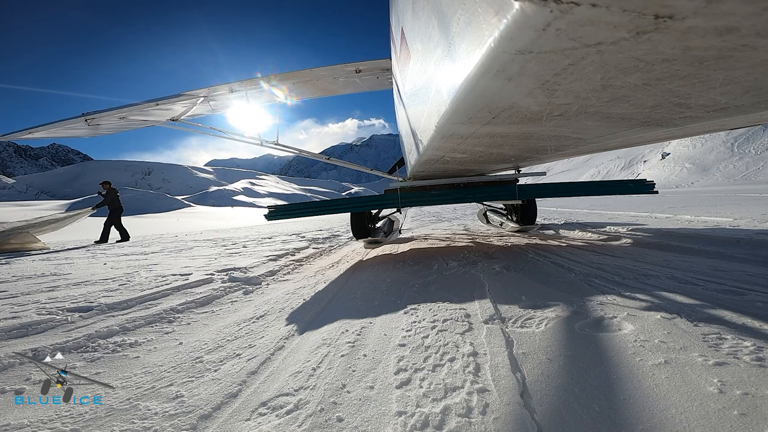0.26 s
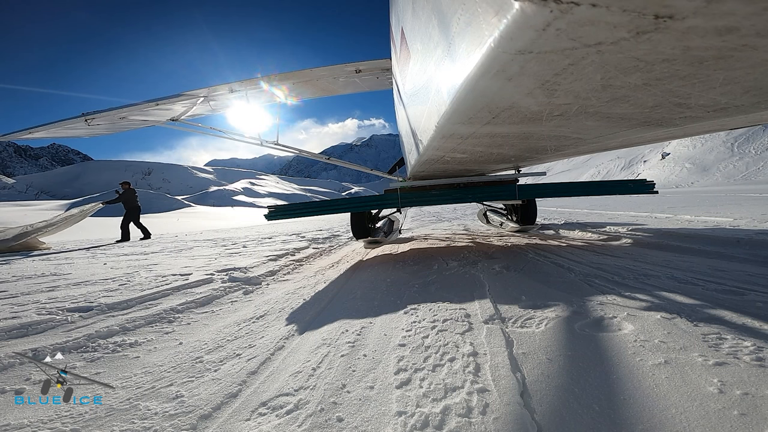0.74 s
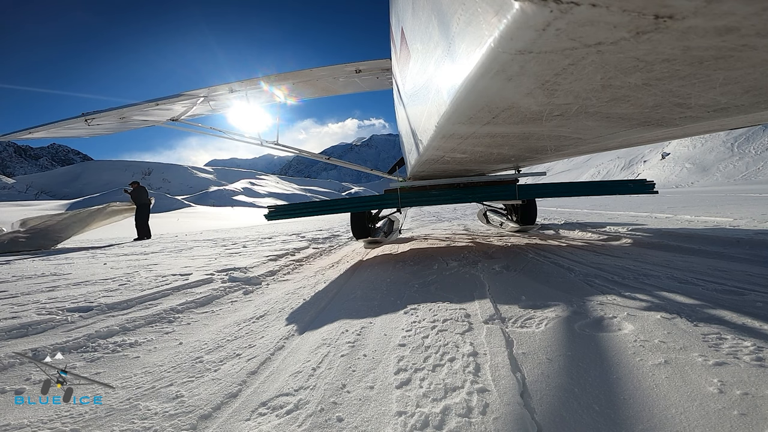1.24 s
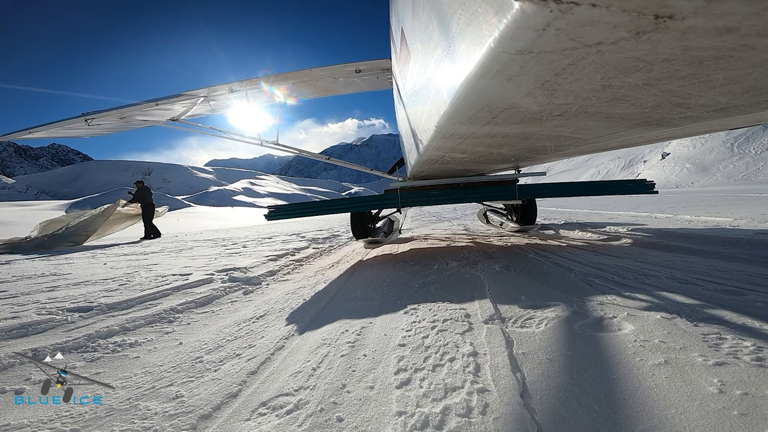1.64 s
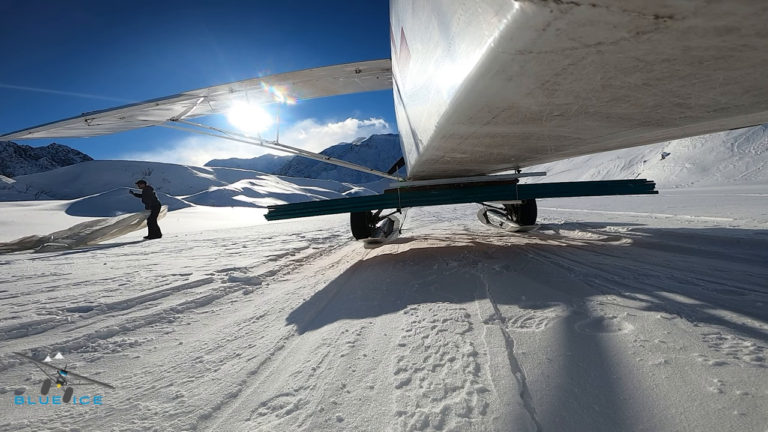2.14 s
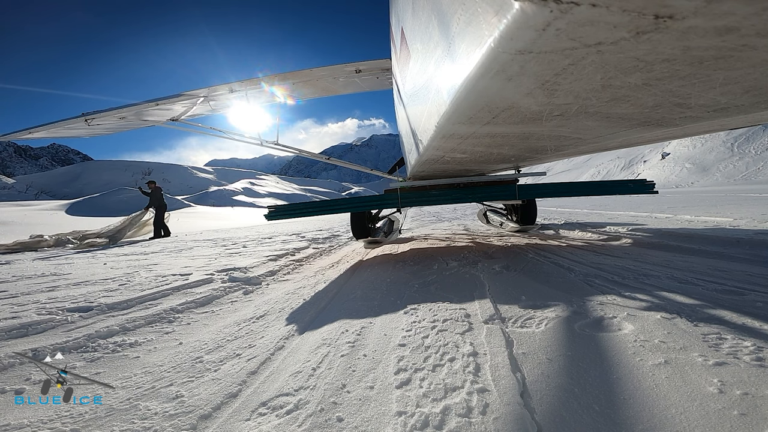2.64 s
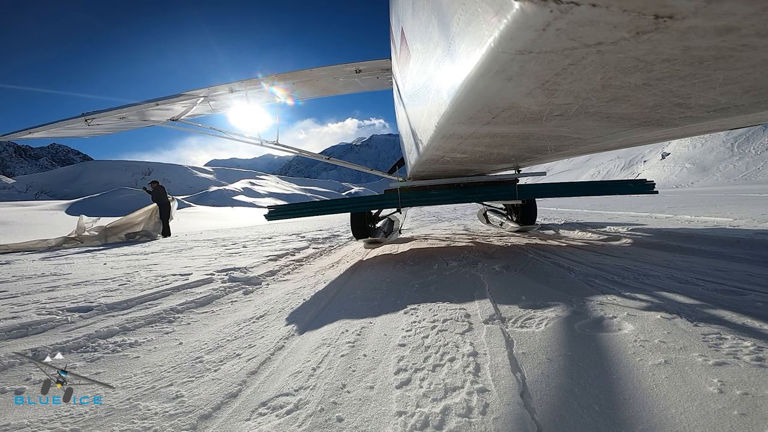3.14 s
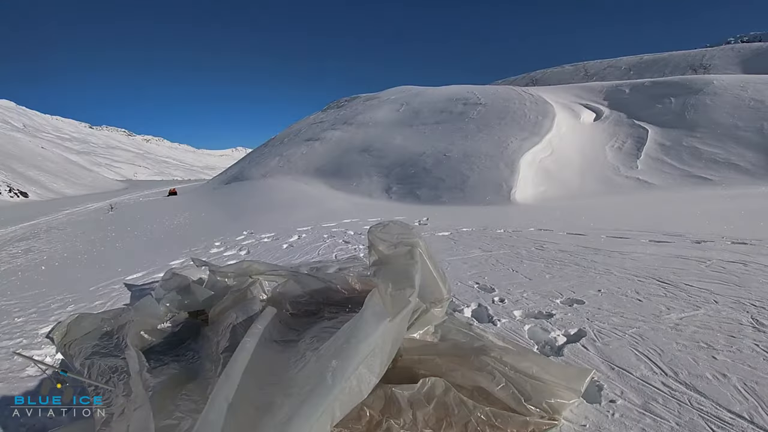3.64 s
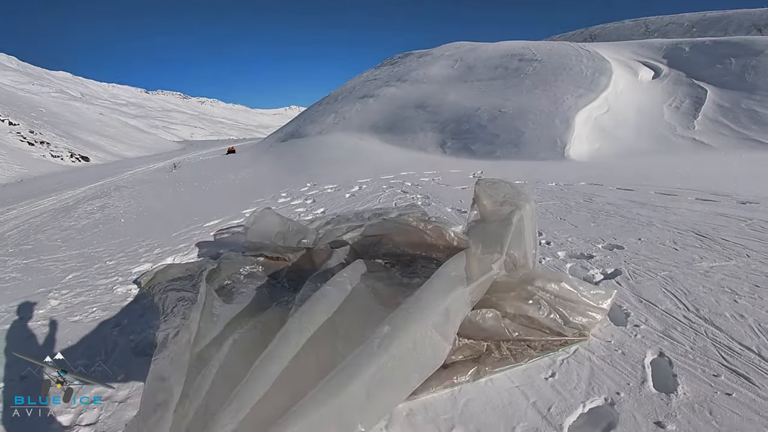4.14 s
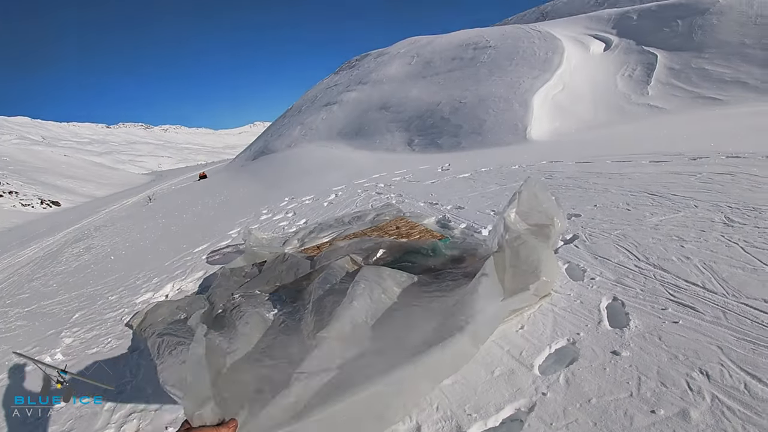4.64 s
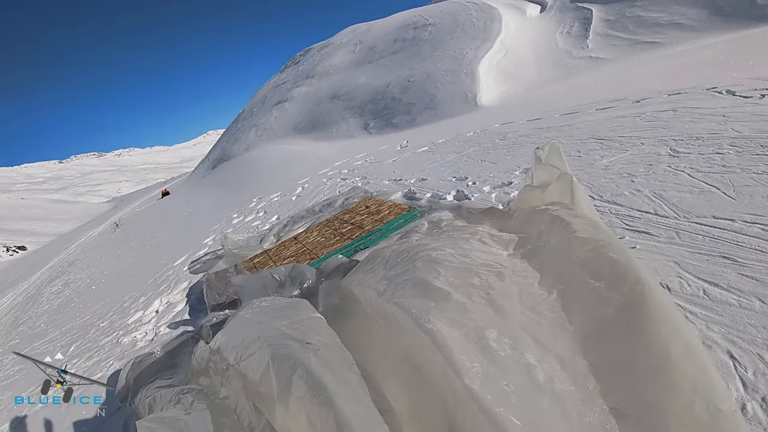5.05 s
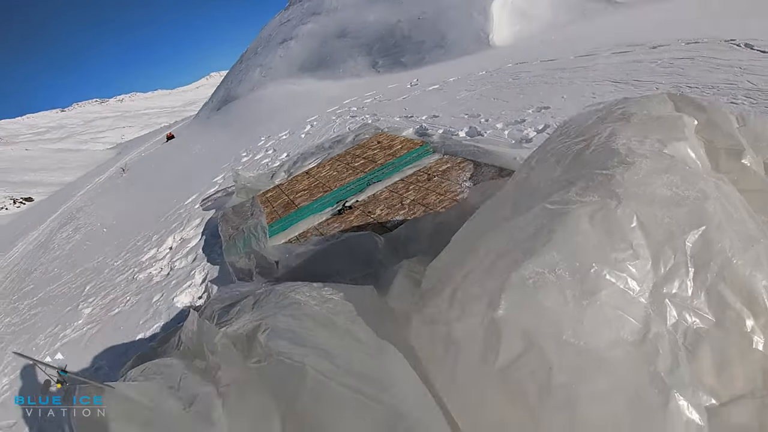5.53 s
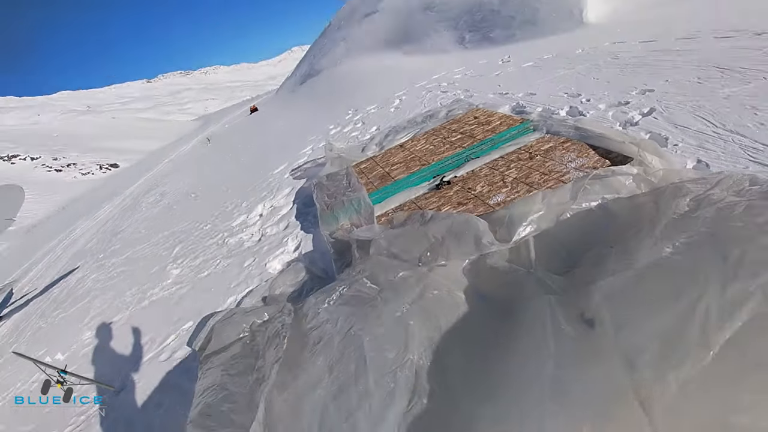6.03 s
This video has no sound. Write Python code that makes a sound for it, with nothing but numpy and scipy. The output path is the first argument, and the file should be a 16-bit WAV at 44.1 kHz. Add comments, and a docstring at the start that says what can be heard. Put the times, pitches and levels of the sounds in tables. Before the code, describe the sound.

Distant swishing drags of plastic over snow cut suddenly to loud close crinkling and flapping, ending with a few soft crunching knocks.

```python
"""Open snow, with a big sheet of clear plastic dragged in tugs some way off to the left of the microphone.
Then, abruptly, it is right at the microphone: it rubs, crackles, snaps and billows, pulled over a crate.
At the very end the sheet stops; a few soft crunching knocks remain in faint open air.
Rubbing, crackle and billow are coloured noise, much of it driven by random crease flips;
snaps are short noise bursts, flaps and knocks are sagging tones with noise, heaves are low rumble."""
import sys
import numpy as np
from scipy import signal
from scipy.fft import rfft, irfft, next_fast_len
from scipy.io import wavfile
from scipy.ndimage import uniform_filter1d, map_coordinates

SR = 44100
rng = np.random.default_rng(int(sys.argv[2]) if len(sys.argv) > 2 else 0)


def dump(signal):
    """Clip the signal to [-1, 1] and save it as 16-bit WAV at the path in sys.argv[1]."""
    limited = np.clip(np.atleast_2d(signal).T, -1, 1)
    pcm = np.round(limited * 32767).astype(np.int16)
    wavfile.write(sys.argv[1], SR, pcm)


N = 277150


def amp(db):
    """Decibels to gain."""
    return 10 ** (np.asarray(db) / 20)


def unit(x):
    """Scale to rms 1."""
    return x / np.sqrt(np.mean(x ** 2) + 1e-20)


def curves(rows):
    """One value per sample for each column after the time."""
    s, *cols = np.transpose(rows)
    return [np.interp(np.arange(N) / SR, s, c) for c in cols]


def wobble(rate):
    """A smooth random curve with rate knots a second."""
    knots = rng.standard_normal(int(N * rate / SR) + 4)
    return map_coordinates(knots, [np.arange(N) * rate / SR])


def along(points, hz):
    """(frequency [Hz], value) points joined on a log frequency axis."""
    f, v = np.transpose(points)
    return np.interp(np.log(hz + 1), np.log(f), v)


def filtered(x, response):
    """x times a complex response of frequency, padded so that the end does not wrap round."""
    m = next_fast_len(N + SR // 2)
    return irfft(rfft(x, m) * response(np.fft.rfftfreq(m, 1 / SR)), m)[..., :N]


def coloured(x, spectrum):
    """x through a (frequency [Hz], gain [dB]) spectrum."""
    return filtered(x, lambda hz: amp(along(spectrum, hz)))


def add(track, s, sound):
    """Mix a short sound into a track at time s."""
    part = track[max(round(s * SR), 0):][:len(sound)]
    part += sound[:len(part)]


def stroke(start, rise, hold, release_db_per_s):
    """Gain of one tug: it builds up, holds and dies away."""
    t = np.arange(N) / SR - start
    return np.clip(t / rise, 0, 1) * amp(-release_db_per_s * np.maximum(t - rise - hold, 0))


def dappled(x, depth_db, size):
    """Random gain patches in time and pitch: every facet of the sheet favours its own frequencies."""
    z = signal.stft(x, nperseg=size)[2]
    field = uniform_filter1d(rng.standard_normal(z.shape), size=3, axis=0)
    field = uniform_filter1d(field, size=3, axis=1)
    return signal.istft(z * amp(depth_db * unit(field)), nperseg=size)[1][:N]


def buckling(rate, spread_db, life, clump_db):
    """Power (mean near 1) of creases flipping at random, rate a second; strength swells in clumps.

    The amplitude of each flip falls to 1/e in life seconds."""
    flips = rng.random(N) < rate / SR
    strength_db = spread_db * np.clip(rng.standard_normal(N), -2.2, 2.2)
    sizes = amp(strength_db + clump_db * wobble(70))
    power = signal.lfilter([1], [1, -np.exp(-2 / (life * SR))], flips * sizes ** 2)
    # the pull sets the mean power, however it is shared among the creases
    local_mean = uniform_filter1d(uniform_filter1d(power, size=3000), size=3000)
    return power / (np.abs(local_mean) + 1e-9)


def rustle(power, spectrum, smooth, facet_db):
    """Flips radiate tiny noise bursts; the smooth share stands for the countless smallest ones; rms 1."""
    bursts = rng.standard_normal(N) * np.sqrt(smooth + (1 - smooth) * power)
    return unit(coloured(dappled(bursts, facet_db, size=192), spectrum))


def snap(hz, t60, octaves):
    """One crease popping through: a noise burst of peak 1 around its facet's pitch, down 60 dB in t60 s."""
    t = np.arange(SR // 20) / SR
    distance = np.log2((np.fft.rfftfreq(len(t), 1 / SR) + 1) / hz) / octaves
    ring = irfft(rfft(rng.standard_normal(len(t))) / (1 + distance ** 4), len(t))
    attack = 1 - np.exp(-t / 0.0002)
    burst = np.tanh(unit(ring)) * amp(-60 * t / t60) * attack
    return burst / np.abs(burst).max()


def thump(hz, t60, sag):
    """A slack panel swings a few times, its pitch sagging as the tension goes; peak 1."""
    t = np.arange(SR // 4) / SR
    fade = amp(-60 * t / t60)
    cycles = hz * np.cumsum(1 - sag * (1 - fade)) / SR
    swing = np.sin(2 * np.pi * cycles) * fade * (1 - np.exp(-2 * hz * t))
    return swing / np.abs(swing).max()


def strays(level_db, per_s, over_db, centre_hz, clump_db):
    """Lesser creases pop at random moments, louder in flurries, each with its own pitch and life."""
    out = np.zeros(N)
    flurry_db = level_db + over_db + clump_db * np.tanh(wobble(45))
    for s in rng.uniform(0, (N - 1) / SR, int(per_s * N / SR)):
        pitch, life = np.clip(rng.standard_normal(2), -1.6, 1.6)
        hz = centre_hz * 2 ** (0.48 * pitch)
        pop = snap(hz, t60=0.007 * np.exp(0.72 * life), octaves=0.32)
        add(out, s, amp(flurry_db[int(s * SR)]) * pop)
    return out


# tugs on the distant sheet, before slackening and catching: (time [s], rise [s], hold [s],
# release [dB/s], sliding level [dB], crackle level [dB], billow level [dB])
DISTANT_TUGS = [(0.133, 0.11, .02, 45, -49, -44, -44), (0.37, .04, .02, 60, -52, -47, -48),
                (0.83, .06, .1, 40, -45, -46, -45), (0.9, .19, .12, 25, -38, -39.5, -41.5),
                (1.78, 0.026, 0.22, 98, -33, -39, -45), (2.57, 0.22, 0.17, 34, -37.5, -42, -43)]
# the lifted sheet settles back onto the snow: (time [s], sliding level [dB], billow level [dB])
SETTLINGS = [(1.33, -35.5, -40.5), (3.002, -39, -46)]
SETTLE_RISE_S, SETTLE_HOLD_S, SETTLE_RELEASE_DB_PER_S = 0.042, 0.053, 83
# the sheet still creeps between tugs, ever more quietly
IDLE_SLIDE_DB, IDLE_CRACKLE_DB, IDLE_BILLOW_DB = -45, -48, -49
IDLE_FADE_DB_PER_S = 2.0
CREASE_RISE_SHARE = 0.93  # creases tighten and flip before the whole sheet is sliding
# the sheet slackens just before each tug: depth, lead, half length
SLACK_DB, SLACK_LEAD_S, SLACK_S = -2.5, 0.028, 0.025


def drag_gains():
    """Gains of sliding, crackle and billow: tugs and settling add in power to a slow creep."""
    t = np.arange(N) / SR
    idle_db = np.array([[IDLE_SLIDE_DB], [IDLE_CRACKLE_DB], [IDLE_BILLOW_DB]])
    slide, crackle, billow = amp(idle_db - IDLE_FADE_DB_PER_S * t)
    for start, rise, hold, release, slide_db, crackle_db, billow_db in DISTANT_TUGS:
        tug = stroke(start, rise, hold, release)
        tightening = stroke(start, CREASE_RISE_SHARE * rise, hold, release)
        slide = np.hypot(slide, tug * amp(slide_db))
        crackle = np.hypot(crackle, tightening * amp(crackle_db))
        billow = np.hypot(billow, tug * amp(billow_db))
    for start, slide_db, billow_db in SETTLINGS:
        settle = stroke(start, SETTLE_RISE_S, SETTLE_HOLD_S, SETTLE_RELEASE_DB_PER_S)
        slide = np.hypot(slide, settle * amp(slide_db))
        billow = np.hypot(billow, settle * amp(billow_db))
    slack = sum(np.exp(-((t - start + SLACK_LEAD_S) / SLACK_S) ** 2) for start, *_ in DISTANT_TUGS)
    return np.array([slide, crackle, billow]) * amp(SLACK_DB * slack)


def tick():
    """A distant crease: a short, bright crack over the dull ring of its panel."""
    ring = amp(-1) * snap(hz=1350, t60=0.018, octaves=0.6)
    crack = amp(-4) * snap(hz=3800, t60=0.012, octaves=0.8)
    return ring + crack


# share of the sliding power that is a hollow scrape on the snow crust: (time [s], share [0-1])
CRUST_SHARE = [(0, 0.5), (1.4, 0), (1.9, 0.92), (2.2, 0.75), (3.5, 0.99)]
# relative noise spectra of the distant sheet: (frequency [Hz], density [dB per Hz])
DISTANT_GLIDE = [(200, -16), (430, -4), (640, 2), (830, -0.5), (1100, 2), (1450, 1.5), (1800, -2.5),
                 (2300, -16), (3200, -13), (7000, -58)]
DISTANT_SCRAPE = [(250, -39), (420, -17), (660, -8), (810, -16.5), (1010, -2), (1350, -4.5), (1750, -12),
                  (2400, -15.5), (7000, -66)]
DISTANT_CRACKLE = [(1200, -18), (2100, -6), (2900, -3), (3600, 0), (4300, -4), (5000, -9.5), (6500, -12),
                   (8500, -17.5), (12500, -33), (15500, -57)]
DISTANT_BILLOW = [(20, -32), (45, -23), (70, -11.5), (120, -6.5), (180, 1.5), (270, -3.5), (400, -8.5),
                  (1000, -46), (3000, -90)]
# single creases that snap far off, before distance dulls them: (time [s], level [dB])
DISTANT_TICKS = [(0.0857, -26), (0.2533, -31), (1.5868, -29), (2.2817, -27.5), (2.4184, -36), (2.4897, -36),
                 (2.5965, -32), (3.1564, -29)]
# distance dulls a tick on its way to the microphone: (frequency [Hz], gain [dB])
DISTANCE_LOSS = [(1000, -1), (5000, 0), (9000, -1.5), (13000, -5), (15500, -25)]


def distant_sheet():
    """Each tug slides the sheet over the snow, flips creases and shakes its slack."""
    catch_db = 1.04 * wobble(11)  # the film catches and slips on the snow
    slide_gain, crackle_gain, billow_gain = drag_gains() * amp(catch_db)
    crust, = curves(CRUST_SHARE)
    creases = buckling(rate=700, spread_db=4.5, life=0.0039, clump_db=1.5)
    glide = np.sqrt(1 - crust) * rustle(creases, DISTANT_GLIDE, smooth=1.0, facet_db=2.0)
    scrape = np.sqrt(crust) * rustle(creases, DISTANT_SCRAPE, smooth=0.49, facet_db=1.5)
    slide = slide_gain * (glide + scrape)
    crinkles = buckling(rate=800, spread_db=2.0, life=0.004, clump_db=4.0)
    flips = 0.5 * (creases + crinkles)
    crackle = crackle_gain * rustle(flips, DISTANT_CRACKLE, smooth=0.52, facet_db=1.0)
    billow = billow_gain * rustle(creases, DISTANT_BILLOW, smooth=0.8, facet_db=2.8)
    crackle_db = 20 * np.log10(crackle_gain)
    ticks = strays(crackle_db, per_s=59, over_db=3.6, centre_hz=3200, clump_db=2)
    for s, db in DISTANT_TICKS:
        add(ticks, s, amp(db) * tick())
    return slide + crackle + billow + coloured(ticks, DISTANCE_LOSS)


def scattered(x):
    """The same bursts with their waves jumbled, as after many ever-changing bounces."""
    z = signal.stft(x, nperseg=128)[2]
    random_phase = np.exp(2j * np.pi * rng.random(z.shape))
    jumbled = signal.istft(z * random_phase, nperseg=128)[1][:N]
    return unit(jumbled) * np.std(x)


# left microphone port over right port: (frequency [Hz], level difference [dB])
PORT_SHADE = [(200, 0), (500, 1), (1300, 0.2), (2400, 6), (8000, 3.5), (15000, -3)]
# sound thrown back by nearby surfaces: (frequency [Hz], gain [dB])
SCATTER_COLOUR = [(100, -16), (750, -10), (1500, 3), (14000, -3)]


def from_left(x, lead_ms, scatter_db):
    """The left port hears the source earlier and mostly louder; snow and air scatter it to both ports."""
    sides = np.array([[1], [-1]]) / 2  # each port takes half the difference

    def ports(hz):
        lead = np.exp(2j * np.pi * hz * sides * lead_ms / 1000)
        return amp(along(PORT_SHADE, hz) * sides) * lead

    bounces = np.array([scattered(x), scattered(x)])
    return filtered(x, ports) + amp(scatter_db) * coloured(bounces, SCATTER_COLOUR)


# quiet open air, relative noise spectrum: (frequency [Hz], density [dB per Hz])
OPEN_AIR = [(20, 7), (70, 1), (200, 11), (500, -18), (1200, -14), (4000, -16), (14000, -39)]


def air():
    """Faint steady rush of the open snowfield: coloured noise, rms 1."""
    return unit(coloured(rng.standard_normal(N), OPEN_AIR))


# slack panels that flap taut, far then close:
# (time [s], thump peak level [dB], pitch before sagging [Hz], swings in a 60 dB fade at that pitch)
PANEL_FLAPS = [(0.006, -32, 130, 6), (3.556, -21, 280, 9), (3.732, -15, 56, 4), (3.8545, -10.5, 340, 4),
               (3.857, -13, 125, 7), (3.986, -13.5, 121, 12), (4.029, -18, 83, 7), (4.096, -12, 108, 7),
               (4.14, -19, 79, 14), (4.245, -17, 127, 9), (4.714, -17.5, 300, 10), (4.731, -15.5, 214, 10),
               (4.958, -15, 65.6, 8), (5.642, -14.5, 62.5, 7), (5.648, -16, 220, 7), (5.768, -18, 85, 6)]
FLAP_SAG = 0.26  # share of its pitch that a panel loses
PUFF_DB, PUFF_OVER_PITCH = -5, 1.02  # the air that a flap pushes aside, relative to the thump


def flaps():
    """Low thumps with a puff of air as panels are jerked taut; swings over pitch set how long each lasts."""
    out = np.zeros(N)
    for s, db, hz, swings in PANEL_FLAPS:
        t60 = swings / hz
        add(out, s, amp(db) * thump(hz, t60, FLAP_SAG))
        puff = snap(PUFF_OVER_PITCH * hz, t60=2.1 * t60, octaves=0.88)
        add(out, s, amp(db + PUFF_DB) * puff)
    return out


# the sheet heaves on the air beneath it, before unevenness:
# (time [s], rise [s], hold [s], rumble level [dB])
AIR_HEAVES = [(0.16, .08, .1, -48), (0.84, .04, .07, -46), (1.03, .03, .4, -47.5), (1.78, .03, .26, -47),
              (2.6, .15, .15, -54), (2.86, .12, .09, -43), (3.8, .04, .07, -29.5), (3.96, .03, .2, -27),
              (4.23, .03, .04, -29), (5.08, .08, .22, -34), (5.63, .02, .16, -30)]
HEAVE_RELEASE_DB_PER_S = 105
# relative noise spectrum of the rumble: (frequency [Hz], density [dB per Hz])
HEAVE_RUMBLE = [(20, -21), (45, -5), (75, 0), (120, -1), (180, -6.5), (400, -43), (1500, -100)]


def heaves():
    """Air rolls under the whole sheet as it lifts: an uneven rumble."""
    power = np.zeros(N)
    for start, rise, hold, db in AIR_HEAVES:
        power += (amp(db) * stroke(start, rise, hold, HEAVE_RELEASE_DB_PER_S)) ** 2
    rumble = unit(coloured(rng.standard_normal(N), HEAVE_RUMBLE))
    return np.sqrt(power) * amp(1.2 * wobble(21.74)) * rumble


# the loudest creases that snap close by, before facet colour: (time [s], peak level [dB], pitch [Hz])
CLOSE_SNAPS = [(3.638, -10, 3680), (3.877, -12, 3440), (3.92, -9, 3470), (3.943, -2, 4000),
               (4.007, -7, 3870), (4.1096, -12, 5290), (4.1976, -10, 6060), (4.397, -8, 3600),
               (4.5303, -9, 4300), (4.563, -11, 4400), (4.579, -11, 3500), (4.613, -22, 4280),
               (4.6248, -8.5, 3900), (4.656, -3.5, 3900), (4.822, -11.5, 6000), (4.839, -7.5, 3930),
               (4.913, -5.5, 4960), (4.987, -6, 5530), (5.014, -7, 3560), (5.0443, -8.5, 3500),
               (5.0662, -4, 2780), (5.219, -9, 3720), (5.234, -3, 3200), (5.274, -9, 2800),
               (5.383, -8, 4200), (5.427, -11.5, 4300), (5.504, -4, 2160), (5.556, -6, 3630),
               (5.6634, -6, 4320), (5.7055, -8, 4950), (5.7283, -10, 5560), (5.7703, -5, 5400),
               (5.792, -9, 5000), (5.813, -3.5, 2270), (5.87, -4.5, 7150), (5.902, -10, 4530),
               (5.922, -7.5, 4500), (5.954, -8, 3020), (5.998, -8, 2800), (6.114, -10, 2980),
               (6.128, -14.5, 3100)]
# radiation of a close snap, also used for the crunch of the knocks: (frequency [Hz], gain [dB])
FACET_RADIATION = [(200, 4), (1500, -5.5), (7900, -3.5), (8800, -14), (10200, -6), (14000, -24),
                   (14900, -65)]
REBOUND_S, REBOUND_DB = 0.0023, -8  # the next stretch of a crease follows a moment later


def close_snaps(pull_db):
    """Loud creases pop in two steps among a dense crinkle of lesser ones, which grows with the pull."""
    out = strays(pull_db, per_s=220, over_db=2.66, centre_hz=4500, clump_db=2.9)
    for s, db, hz in CLOSE_SNAPS:
        add(out, s, amp(db) * snap(hz, t60=0.0053, octaves=0.6))
        add(out, s + REBOUND_S, amp(db + REBOUND_DB) * snap(hz, t60=0.0047, octaves=0.8))
    return coloured(out, FACET_RADIATION)


# how hard the close sheet is pulled: (time [s], strength [dB])
CLOSE_PULL = [(3.56, -23.5), (3.8, -22), (3.965, -27), (4.02, -23.5), (4.4, -25), (4.68, -26.5),
              (4.87, -21), (4.93, -23), (4.99, -18.5), (5.08, -22), (5.15, -18), (5.38, -21), (5.47, -24.5),
              (5.612, -25.5), (5.642, -18), (5.81, -18.5), (5.98, -24), (6.15, -26)]
# the close sheet bunches up from flat film into large folds: (time [s], bunching [0-1])
FOLD_BUNCHING = [(3.8, 0), (4.55, 0.3), (4.87, 0), (5.22, 0.94), (5.68, 0.61), (6.1, 1)]
# levels for flat film relative to the pull, then their change when fully bunched
SLIDE_DB, CRACKLE_DB, CRUMPLE_DB, BILLOW_DB = -2.5, -4.5, -20.5, -11.5
BUNCHED_CRACKLE_DB, BUNCHED_CRUMPLE_DB, BUNCHED_BILLOW_DB = -5, 13.5, 3.5
USUAL_PULL_DB, BILLOW_GROWS = -22, 1.26  # billowing swings wider than the pull around its usual level
# hard yanks slide film on film, before catching: (time [s], swish level [dB])
HARD_YANKS = [(4.95, -35), (5.622, -23.5)]
YANK_RISE_S, YANK_HOLD_S, YANK_RELEASE_DB_PER_S = 0.025, 0.07, 42
# relative noise spectra of the close sheet: (frequency [Hz], density [dB per Hz])
CLOSE_SLIDE = [(170, -4.5), (350, -2.5), (520, -4.5), (850, -0.5), (1150, -1), (1400, 0), (1750, -1),
               (2150, -14.5), (3000, -35), (6000, -60)]
CLOSE_CRACKLE = [(1800, -18), (2700, -5), (3200, -1), (4000, 2), (4850, -10), (5700, -1), (6550, -13),
                 (7700, -4), (8750, -27), (10100, -15.5), (11800, -26.5), (14100, -33), (14900, -65)]
CLOSE_CRUMPLE = [(1000, -11), (1900, 17), (2700, 7.5), (3600, 3.5), (5150, -6), (7000, 1), (10000, -54)]
CLOSE_SWISH = [(3300, -19), (4700, 1), (5400, 2), (6500, -13), (7600, -5), (8800, -27), (14000, -75)]
CLOSE_BILLOW = [(15, -4.5), (35, -9), (70, -5.5), (130, 1), (210, -1), (320, -7), (500, -28), (1500, -74)]


def close_sheet():
    """Close up the single creases stand out: small ones crackle, large folds crumple, the slack billows."""
    pull_db, = curves(CLOSE_PULL)
    bunching, = curves(FOLD_BUNCHING)
    slide_db = pull_db + SLIDE_DB
    crackle_db = pull_db + CRACKLE_DB + BUNCHED_CRACKLE_DB * bunching
    crumple_db = pull_db + CRUMPLE_DB + BUNCHED_CRUMPLE_DB * bunching
    swing_db = USUAL_PULL_DB + BILLOW_GROWS * (pull_db - USUAL_PULL_DB)
    billow_db = swing_db + BILLOW_DB + BUNCHED_BILLOW_DB * bunching
    yank = np.zeros(N)
    for s, db in HARD_YANKS:
        yank += amp(db) * stroke(s, YANK_RISE_S, YANK_HOLD_S, YANK_RELEASE_DB_PER_S)
    small = buckling(rate=1800, spread_db=5.0, life=0.00056, clump_db=2.0)
    large = buckling(rate=430, spread_db=3.0, life=0.0025, clump_db=4.0)
    slide_flips = 0.85 * large + 0.18 * small
    crackle_flips = 0.39 * small + 0.33 * large
    crumple_flips = large + 0.21 * small
    slide = amp(slide_db) * rustle(slide_flips, CLOSE_SLIDE, smooth=0.5, facet_db=0.0)
    crackle = amp(crackle_db) * rustle(crackle_flips, CLOSE_CRACKLE, smooth=0.18, facet_db=1.8)
    crumple = amp(crumple_db) * rustle(crumple_flips, CLOSE_CRUMPLE, smooth=0.37, facet_db=3.0)
    swish = yank * rustle(large, CLOSE_SWISH, smooth=0.44, facet_db=-0.5)
    billow = amp(billow_db) * rustle(large, CLOSE_BILLOW, smooth=0.91, facet_db=2.5)
    catch_db = 0.59 * wobble(20)  # the film catches and slips on the crate
    # echoes between the moving folds keep shifting the fine colour
    film = amp(catch_db) * dappled(slide + crackle + crumple + swish, depth_db=1.23, size=2048)
    return film + billow + close_snaps(pull_db)


# soft crunching knocks at the end, before the trims below:
# (time [s], level [dB], pitch [Hz], crunch level [dB])
LAST_KNOCKS = [(6.174, -31, 120, -23), (6.2, -26, 163, -21.5), (6.226, -20, 250, -20),
               (6.256, -27, 320, -20.5), (6.275, -29, 240, -26)]


def knocks():
    """Dull knocks, a sagging tone and a noise burst, with a little crunch like a boot settling in snow."""
    thuds, crunch = np.zeros((2, N))
    for s, db, hz, crunch_db in LAST_KNOCKS:
        add(thuds, s, amp(db - 2) * thump(hz, t60=0.05, sag=0.35))
        add(thuds, s, amp(db + 1.0) * snap(hz, t60=0.068, octaves=1.0))
        add(crunch, s, amp(crunch_db - 3.0) * snap(hz=2240, t60=0.071, octaves=1.4))
    return thuds + coloured(crunch, FACET_RADIATION)


NEAR_FROM_S, NEAR_TO_S = 3.5495, 6.154  # the sheet is close between these times


def scene():
    """Distant drag on the left, then the close sheet and the last knocks in the centre."""
    t = np.arange(N) / SR
    before = t < NEAR_FROM_S
    after = uniform_filter1d(1.0 * (t >= NEAR_TO_S), size=128)
    far = from_left(distant_sheet(), lead_ms=0.072, scatter_db=-6.5)
    far += amp(-69.5) * np.array([air(), air()])
    near = ~before * (1 - after) * close_sheet()
    last_air = after * amp(-35.0) * air()
    return before * far + near + last_air + heaves() + flaps() + knocks()


TOP_HZ = 15700


def record(dry):
    """The microphone side keeps nothing at or above its band limit."""
    return filtered(dry, lambda hz: hz < TOP_HZ)


dry = scene()
out = record(dry)
dump(out)
```